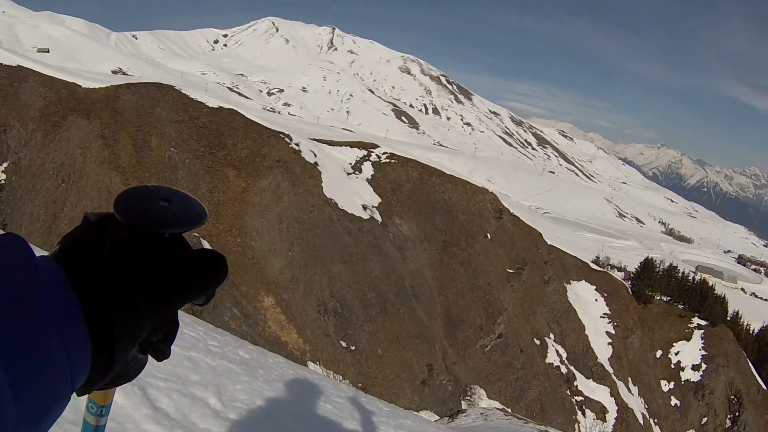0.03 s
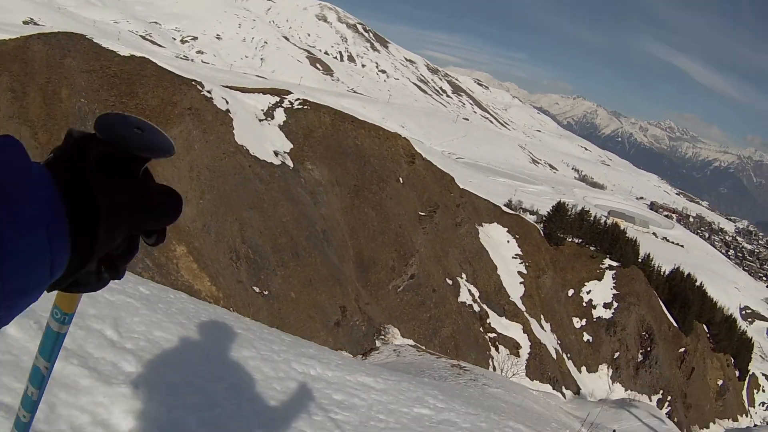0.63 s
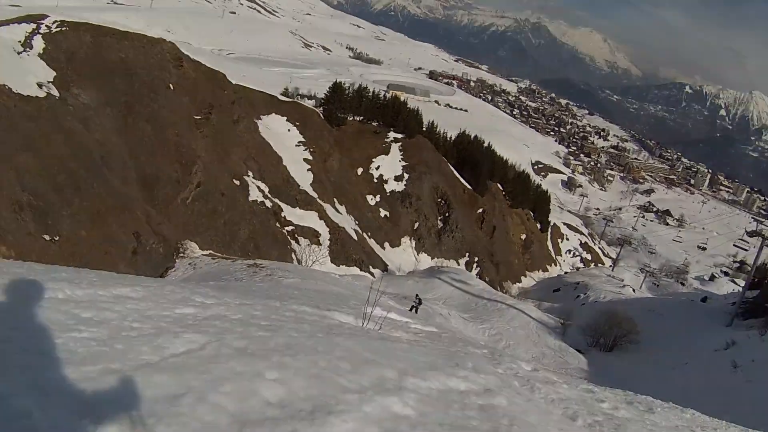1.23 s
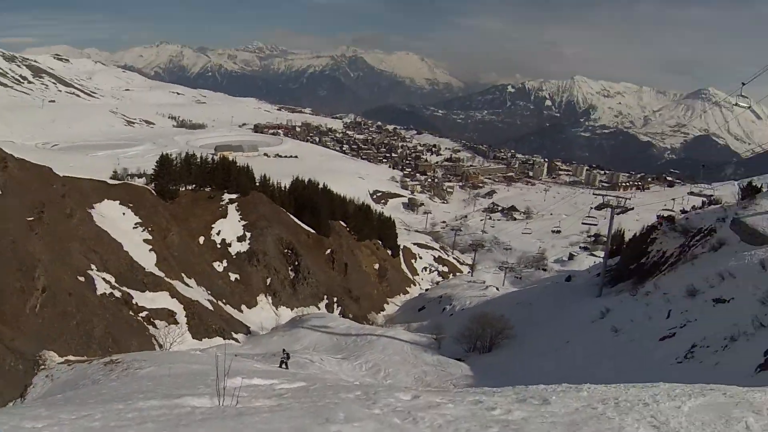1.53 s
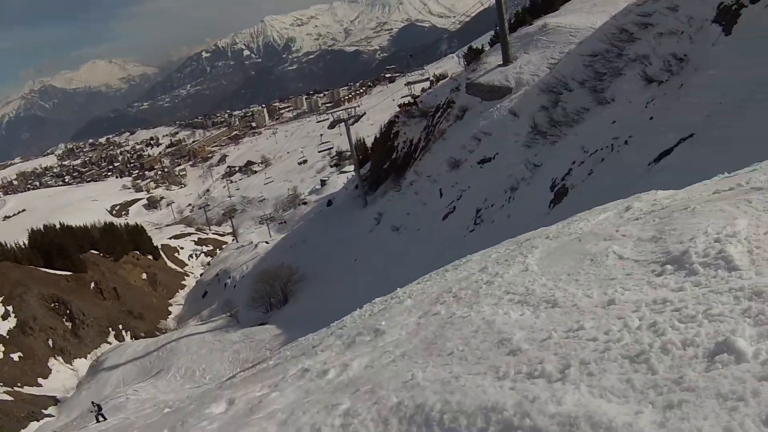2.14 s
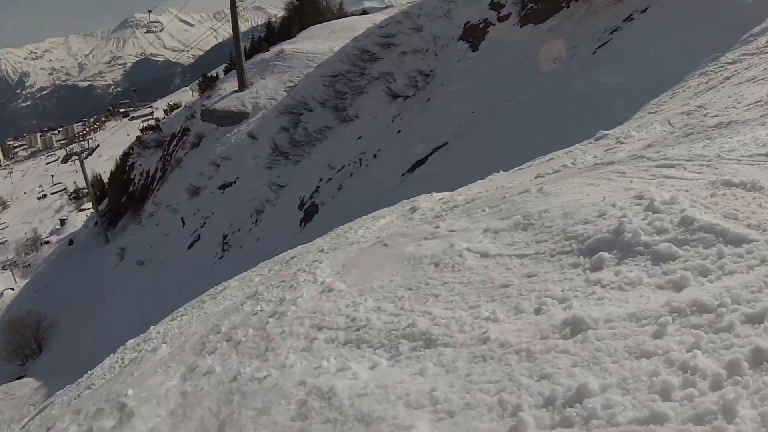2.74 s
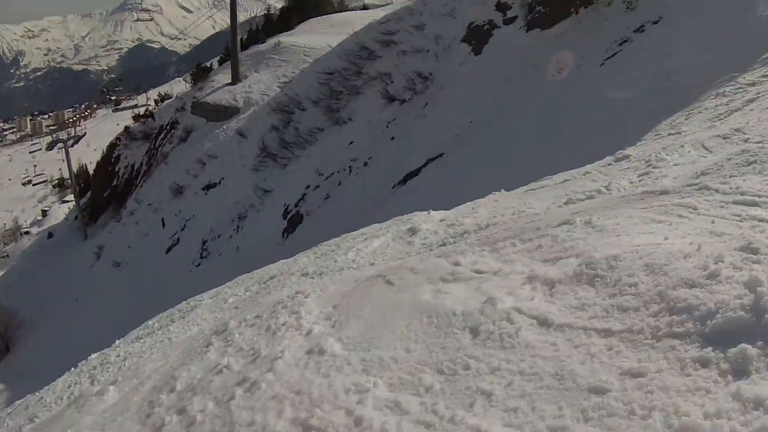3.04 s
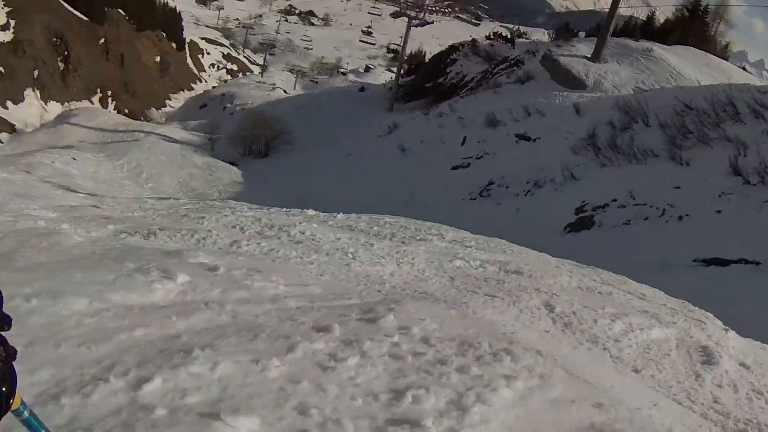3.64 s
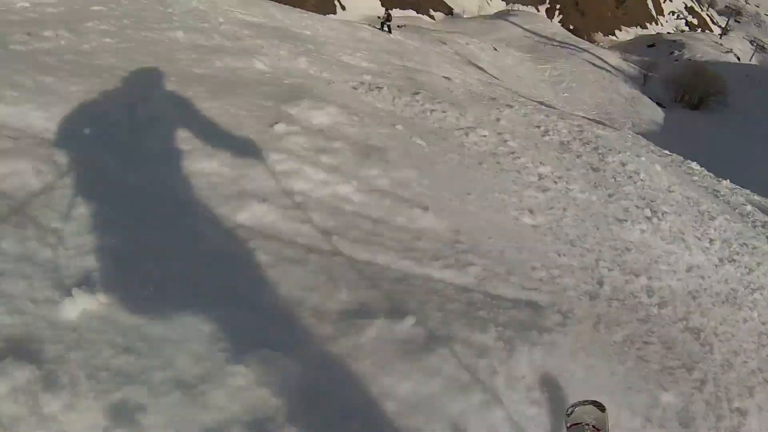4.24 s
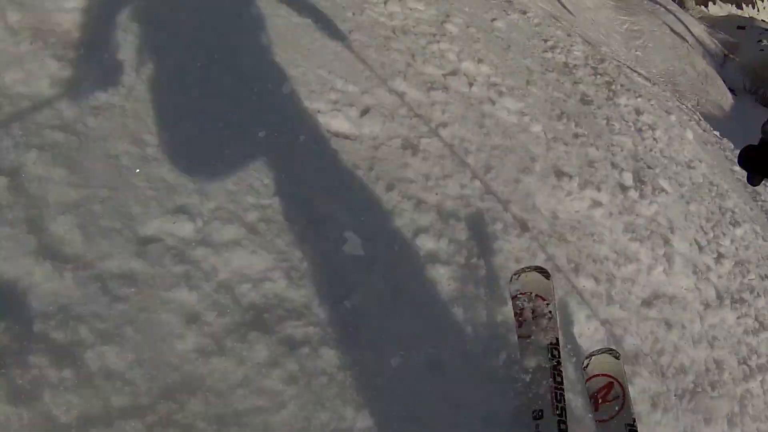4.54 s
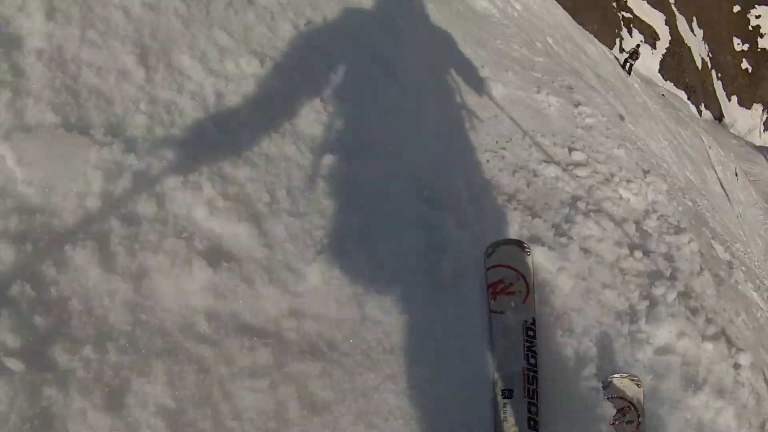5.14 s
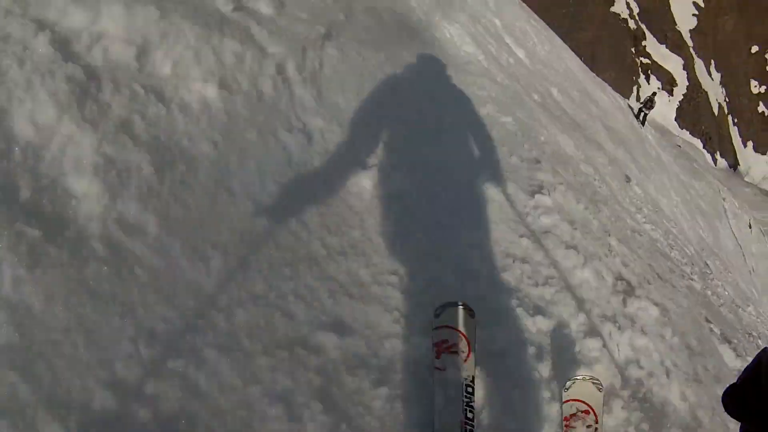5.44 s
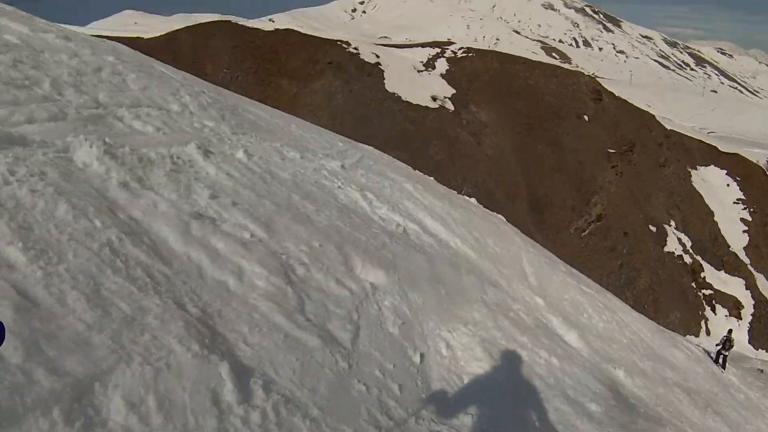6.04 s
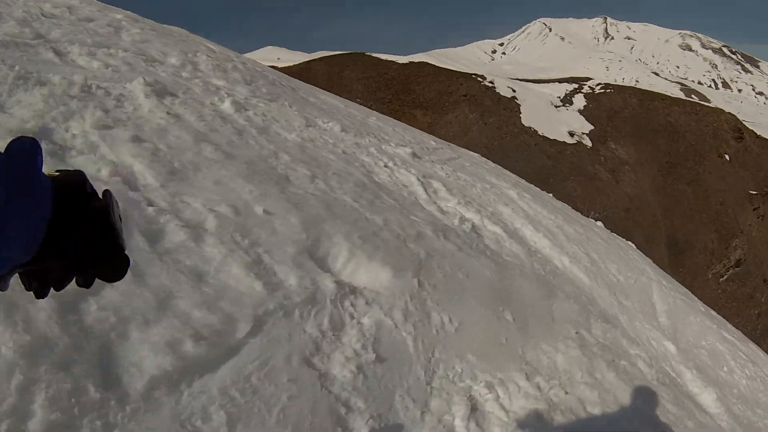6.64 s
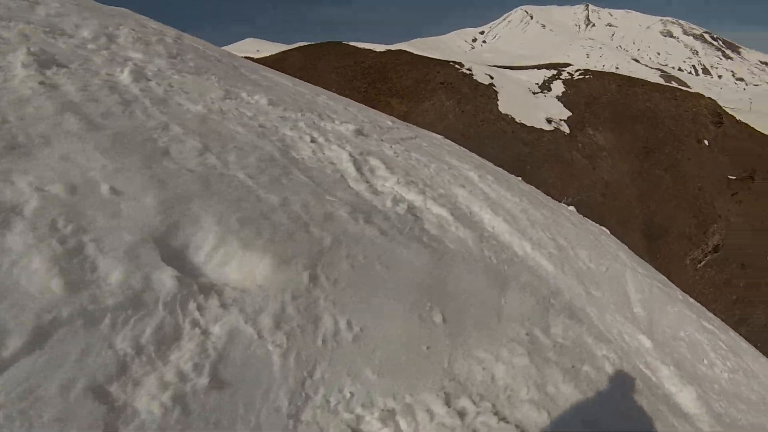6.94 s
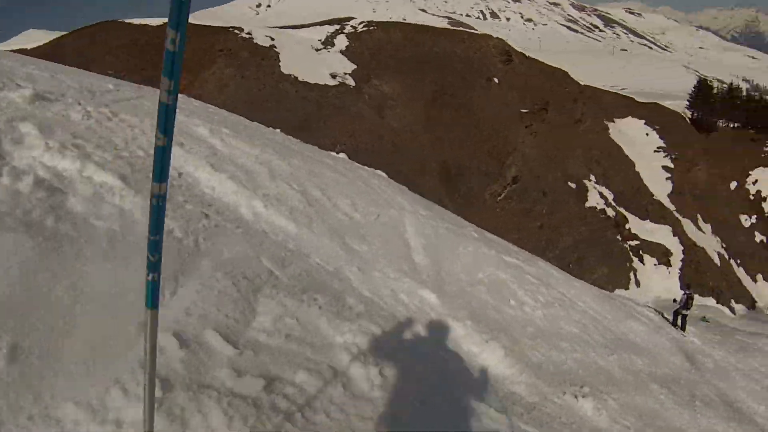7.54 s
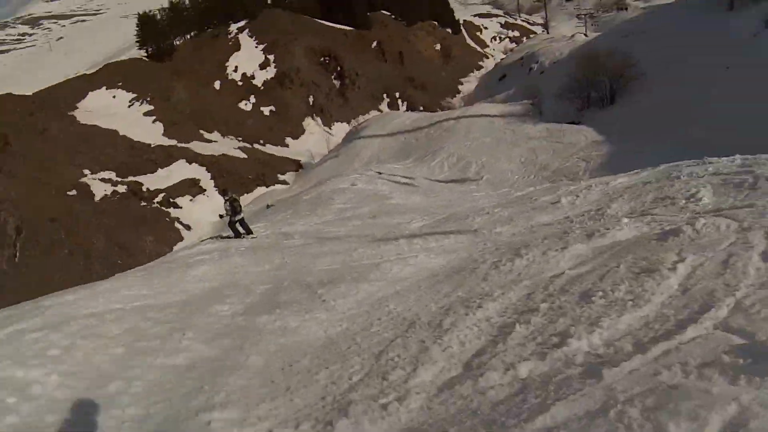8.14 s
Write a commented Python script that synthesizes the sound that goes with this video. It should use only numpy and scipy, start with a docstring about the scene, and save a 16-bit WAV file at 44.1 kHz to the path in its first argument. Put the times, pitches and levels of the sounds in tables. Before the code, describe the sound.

A skier slides down a mountain slope of soft, churned snow, heard from a small body-worn camera in a plastic case. Wind rumbles and gusts on the microphone while the skis rasp and hiss through turns and the case rustles. Midway comes a louder, bumpy skid with hollow clacks, low thumps and stronger wind. Lighter scraping turns follow, and very faint high pips recur throughout.

```python
"""Skiing through soft snow

A skier turns down churned snow, wearing a small camera in a plastic case. The edges crush and shear
grains and throw up spray; a hard, bumpy skid comes in the middle. Turbulent eddies buffet the
microphone and set the case rustling. Gear clacks on the case, jolts thump, and faint high pips recur."""
import sys
import numpy as np
from scipy import signal
from scipy.fft import rfft, irfft
from scipy.io import wavfile
from scipy.ndimage import uniform_filter1d, map_coordinates

SR = 44100
rng = np.random.default_rng(int(sys.argv[2]) if len(sys.argv) > 2 else 0)


def transcribe(u):
    """Save the signal u as a 16-bit wav file named by the first command-line argument.

    u: samples, shape (n,) or (channels, n), limited to [-1, 1]; the rate is SR.
    q: integer samples, one column per channel.
    """
    v = np.clip(np.atleast_2d(u).T, -1, 1)
    q = np.round(v * 32767).astype(np.int16)
    wavfile.write(sys.argv[1], SR, q)


N = 366030


def undb(db):
    """Amplitude ratio of a level in decibels."""
    return 10 ** (np.asarray(db) / 20)


def unit(x):
    """Normalisation to an rms of 1."""
    return x / np.sqrt(np.mean(x ** 2) + 1e-18)


def peak(x):
    """Normalisation to a peak of 1."""
    return x / np.abs(x).max()


def gains(table):
    """Linear interpolation in level: rows (t/s, level/dB, ...) give one envelope per level column."""
    times, *levels = np.transpose(table)
    return [undb(np.interp(np.arange(N) / SR, times, db)) for db in levels]


def bell(s, length_s):
    """Gaussian envelope of height 1, centred on s, with half-power width length_s."""
    return np.exp(-2 * np.log(2) * np.minimum(((np.arange(N) / SR - s) / length_s) ** 2, 20))


def swells(table):
    """Incoherent addition: bells (t/s, width/s, level/dB, ...) sum in power, per level column."""
    power = np.zeros((len(table[0]) - 2, N))
    for s, length_s, *db in table:
        near = slice(max(int((s - 2 * length_s) * SR), 0), int((s + 2 * length_s) * SR))
        power[:, near] += (undb(db)[:, None] * bell(s, length_s)[near]) ** 2
    return np.sqrt(power)


def sags(table):
    """Attenuation: bells (t/s, width/s, depth/dB) sum in decibels; a negative depth is a gain."""
    return undb(-sum(depth_db * bell(s, length_s) for s, length_s, depth_db in table))


def colour(x, points, size=8192):
    """Minimum-phase filter through points (f/Hz, level/dB), made by folding the cepstrum."""
    hz, db = np.transpose(points)
    bins = np.maximum(np.arange(size // 2 + 1) * SR / size, 1)
    magnitude = undb(np.interp(np.log(bins), np.log(hz), db))
    cepstrum = irfft(np.log(magnitude))
    cepstrum[1:size // 2] *= 2
    cepstrum[size // 2 + 1:] = 0
    return signal.fftconvolve(x, irfft(np.exp(rfft(cepstrum))))[:len(x)]


def ring(x, modes):
    """Modal superposition: resonances (f/Hz, bandwidth/Hz, level/dB) add with alternating sign."""
    return sum((-1) ** k * undb(db) * signal.lfilter(*signal.iirpeak(hz, hz / width, SR), x)
               for k, (hz, width, db) in enumerate(modes))


def walk(rate):
    """Smooth random modulation of rms 1, through `rate` independent values a second."""
    steps = rng.standard_normal(N // 16)
    return unit(map_coordinates(steps, [np.arange(N) / SR * rate], order=2, mode="wrap"))


def grains(rate, spread_db):
    """Shot noise: `rate` random impulses a second, with clipped log-normal sizes."""
    hit = rng.random(N) < rate / SR
    size = undb(spread_db * np.clip(rng.standard_normal(N), -2, 2))
    return unit(hit * size * np.sign(rng.standard_normal(N)))


def eddies(spectrum, steady_s):
    """Turbulent pressure: coloured noise whose power stays even over spans longer than steady_s."""
    pressure = colour(rng.standard_normal(N), spectrum)
    power = uniform_filter1d(pressure ** 2, int(steady_s * SR) + 1)
    return unit(pressure / np.sqrt(power + 1e-12))


# Steady air over the microphone: t/s, swell level/dB, buffet level/dB
STEADY_AIR = [(0.0, -39.5, -53.5), (0.16, -39, -49), (0.48, -42.5, -45.5), (0.85, -37, -45),
              (2.5, -41.5, -46.5), (2.91, -36, -40.5), (2.98, -32, -46), (3.12, -49.5, -52.5),
              (4.39, -31, -32.5), (4.48, -17, -27.5), (4.81, -26.5, -28.5), (4.97, -37.5, -44.5),
              (5.99, -42.5, -44.5), (6.13, -37, -38.5), (6.63, -38, -50.5), (7.07, -38.5, -47.5),
              (8.04, -40.5, -43), (8.3, -39.5, -44)]
# Gusts: t/s, width/s, swell level/dB, buffet level/dB
GUSTS = [(0.33, 0.048, -35, -43.5), (0.96, 0.035, -25.5, -64), (1.2, 0.083, -34.5, -44.5),
         (1.48, 0.13, -38, -53.5), (1.85, 0.29, -37.5, -44), (2.22, .15, -42, -44.5),
         (2.59, 0.044, -44, -37.5), (3.68, 0.33, -40.5, -40), (4.23, 0.089, -29, -44),
         (4.54, 0.056, -30, -28), (4.75, 0.15, -21, -43), (5.12, 0.072, -47, -42.5), (6.15, .12, -36, -44),
         (5.33, 0.082, -54, -37), (6.36, 0.055, -32.5, -43.5), (6.57, .08, -31.5, -44.5),
         (7.43, 0.11, -41, -42), (7.66, 0.056, -40, -42.5), (7.79, 0.087, -29, -52),
         (7.98, 0.093, -33.5, -38)]
# Lulls in the air: t/s, width/s, depth/dB
LULLS = [(0.55, 0.1, 6.5), (0.78, .06, 2), (1.02, 0.077, 6), (1.38, 0.047, 2.5), (1.61, 0.053, 4),
         (2.065, 0.067, 6), (3.32, 0.063, -2), (4.63, 0.047, 3.5), (5.72, 0.04, -2), (6.46, 0.072, 4.5),
         (7.186, 0.087, 2), (7.57, 0.063, 9), (7.89, 0.1, 3)]
def airflow():
    """Envelopes of large and small eddies: steady flow and gusts add in power and drop in lulls."""
    swell, buffet = gains(STEADY_AIR)
    gust_swell, gust_buffet = swells(GUSTS)
    calm = sags(LULLS)
    return calm * np.hypot(undb(1.5) * swell, gust_swell), calm * np.hypot(undb(-0.5) * buffet, gust_buffet)


# Pressure spectra of large and of small eddies: f/Hz, relative level/dB
SWELL_SPECTRUM = [(8, -8), (22, 1.5), (34, -5.5), (55, -11.5), (85, -17), (140, -32), (300, -80)]
BUFFET_SPECTRUM = [(40, -21), (75, 0), (125, -0.5), (205, -14.5), (285, -13), (370, -25.5), (500, -30),
                   (650, -33), (1100, -33), (3000, -76.5)]
def wind(flutter, swell, buffet):
    """Turbulence: large eddies sway the diaphragm and modulate the flurries of smaller ones."""
    slow = eddies(SWELL_SPECTRUM, steady_s=0.11)
    roughness = undb(2 * flutter - 1.82 * slow)  # greatest in the suction at a large eddy's core
    quick = unit(eddies(BUFFET_SPECTRUM, steady_s=0.0657) * roughness)
    return swell * slow + buffet * quick


# Modes of the case walls: f/Hz, bandwidth/Hz, relative level/dB
WALL_MODES = [(1446, 112, -4), (2140, 194, 2), (2380, 208, 0.5), (3140, 690, -12), (3810, 620, -14.5)]
# Rubbing carried through the mount: f/Hz, relative level/dB
RUB_SPECTRUM = [(90, -17.5), (205, -4.5), (275, -4.5), (370, -12), (500, -13), (650, -16), (1100, -22.5),
                (3000, -35.5), (5000, -42), (12000, -57)]
def case_rustle(flutter, shear, buffet, buzz):
    """Forced vibration: edge load, eddies and rasps buzz the thin walls; the mount conducts a rub."""
    rest_db = -59.5
    shaking = np.sqrt(undb(rest_db) ** 2 + (undb(-5) * shear) ** 2 + (undb(-18) * buffet) ** 2 + buzz ** 2)
    drive = grains(rate=3200, spread_db=2) * undb(1.1 * flutter + 1.62 * walk(130))
    walls = unit(ring(drive, WALL_MODES))
    rub = unit(colour(drive * undb(0.84 * walk(70)), RUB_SPECTRUM))
    return shaking * (undb(-0.57) * walls + undb(-3.5) * rub)


# Turns: t/s at full load, attack/s, hold/s, release/s, hiss level/dB, spray/dB re hiss, scrape/dB re hiss
TURNS = [(2.698, 0.49, 0.06, 0.28, -51, -11, 1.5), (3.4, 0.12, 0.14, 0.33, -55, -8, 1),
         (4.148, 0.076, 0.12, 0.094, -49, -11.5, -0.5), (4.388, 0.078, 0.027, 0.15, -43.5, -14, 3.5),
         (4.633, .015, .22, 0.46, -48, -8.5, 4.5), (5.4, 0.87, 2.73, 0.17, -56.5, -8.5, -0.5),
         (6.33, 0.38, 0.058, 0.39, -48, -16, 2.5)]
def edge_load():
    """Envelopes of shear, spray and scrape: each turn's load grows and decays exponentially."""
    t = np.arange(N) / SR
    glide_db = [[-65], [-72], [-59.5]]  # shear, spray and scrape of flat skis
    power = undb(glide_db) ** 2
    for s, attack_s, hold_s, release_s, db, spray_db, scrape_db in TURNS:
        rise = np.minimum((t - s) / attack_s, 0)
        fall = np.maximum((t - s - hold_s) / release_s, 0)
        load = undb(db) * np.exp(rise - fall)
        power = power + np.array([load, undb(spray_db) * load, undb(scrape_db) * load]) ** 2
    return np.sqrt(power)


# Resonances in the edge scrape: f/Hz, bandwidth/Hz, relative level/dB
EDGE_MODES = [(1288, 158, -1.5), (1522, 194, 3)]
# Spectra of crushed snow, shearing grains and fine spray: f/Hz, relative level/dB
CRUNCH_SPECTRUM = [(200, -12.5), (450, -9.5), (800, -7), (1150, -0.5), (1800, -3.5), (2500, -8),
                   (3200, -26), (8000, -40.5)]
HISS_SPECTRUM = [(900, -0.5), (2000, 7), (2850, -6), (3120, 4.5), (3950, 4), (4400, 3), (4950, 5),
                 (5600, 0.5), (6200, -4.5), (6850, 2), (7900, -12.5), (9000, -24), (16000, -40)]
SPRAY_SPECTRUM = [(3000, -5), (6000, -23), (7300, 1.5), (8000, 2.5), (8600, -2), (10000, -7.5), (11400, -2),
                  (12700, -11.5), (15000, -16.5)]
# Showers of loose snow: t/s, width/s, spray level/dB
SHOWERS = [(1.02, 0.1, -62.5), (1.63, 0.026, -63), (2.87, .05, -59), (3.1, 0.18, -62.5), (3.93, .04, -65),
           (4.55, 0.028, -62.5), (8.21, .04, -70)]
def skis(flutter, shear, spray, edge):
    """Granular friction: the edges crush lumps, shearing grains hiss and fine spray falls back."""
    shower, = swells(SHOWERS)
    lumps = walk(34)
    crush = grains(rate=4500, spread_db=2.5) * undb(1.25 * lumps + 0.24 * flutter + 1.4 * walk(160))
    scrape = undb(-2) * unit(ring(crush, EDGE_MODES)) + undb(-6.5) * unit(colour(crush, CRUNCH_SPECTRUM))
    hiss = unit(colour(grains(rate=16000, spread_db=6) * undb(1.17 * lumps), HISS_SPECTRUM))
    mist = unit(colour(grains(rate=11000, spread_db=1.5) * undb(lumps), SPRAY_SPECTRUM))
    return edge * scrape + np.hypot(shear, undb(4.5) * shower) * hiss + np.hypot(spray, shower) * mist


# Rasps over rough patches: t/s, width/s, case buzz level/dB, edge scrape level/dB
RASPS = [(0.3, 0.17, -53.5, -60.5), (0.79, 0.13, -54, -59), (0.91, 0.066, -50, -51),
         (1.16, .04, -52.5, -54), (1.25, 0.042, -48, -49.5), (1.65, 0.083, -49.5, -60),
         (1.76, 0.056, -52, -48.5), (2.21, 0.11, -49, -56), (2.315, .06, -50.5, -61),
         (2.47, 0.096, -54.5, -62), (2.59, 0.037, -46.5, -52), (2.71, 0.089, -48, -46.5),
         (2.9, 0.046, -51.5, -52), (3.04, .1, -62, -65), (3.5, 0.14, -52, -55), (3.77, 0.14, -52.5, -54),
         (3.96, 0.063, -52.5, -52.5), (4.16, 0.15, -49, -48), (4.41, 0.045, -43, -44),
         (4.5, 0.068, -44, -45), (4.71, 0.065, -58, -39), (4.85, 0.037, -40.5, -43), (5.32, 0.15, -55, -53),
         (5.87, 0.053, -54, -46), (5.99, 0.037, -44, -44.5), (6.08, 0.065, -42, -52),
         (6.26, 0.05, -43.5, -46), (6.36, 0.097, -48.5, -57), (6.57, 0.047, -50, -46),
         (6.92, 0.11, -50, -49), (7.075, 0.066, -49, -45.5), (7.42, 0.071, -50, -52),
         (7.64, 0.038, -50, -53), (7.81, 0.031, -54, -66), (7.98, .08, -54, -51), (8.09, 0.027, -42.5, -50)]
# Moments when the skis go light: t/s, width/s, depth/dB
LIFTS = [(0.56, 0.17, 3.5), (1.36, 0.088, 0.5), (1.85, .06, 1.5), (3.26, 0.061, -0.5), (4.28, 0.019, 3),
         (4.59, 0.035, 2), (4.8, 0.024, 5), (7.21, 0.07, 1), (8.15, 0.053, 6)]
def sliding(flutter, buffet):
    """Friction noise follows load and roughness, in the case and at the skis alike."""
    shear, spray, scrape = edge_load()
    buzz, rasp = swells(RASPS)
    rustle = case_rustle(flutter, shear, buffet, buzz)
    snow = skis(flutter, shear, spray, np.hypot(scrape, rasp))
    return sags(LIFTS) * (rustle + snow)


def pips(hz=11310, level_db=-70, length_s=0.011, per_s=11):
    """Tone bursts: a faint sine gated at uneven intervals, probably by the camera's electronics."""
    t = np.arange(N) / SR
    since_onset = (t * per_s + .3 * walk(7)) % 1 / per_s
    gate = np.sin(np.pi * np.minimum(since_onset / length_s, 1))
    return undb(level_db + 2.5 * walk(9)) * gate * np.sin(2 * np.pi * hz * t)


# Modes of the struck case: f/Hz, bandwidth/Hz, relative level/dB
CLACK_MODES = [(1340, 140, 8), (2030, 83, 4)]
# Broadband body of a knock: f/Hz, relative level/dB
CRACK_SPECTRUM = [(200, -4), (500, 0), (800, -3), (1400, 0), (2300, -3), (3400, -14), (6000, -32),
                  (15000, -50)]
# Knocks of gear on the case: t/s, clack peak level/dB, tick peak level/dB, contact decay time/s
KNOCKS = [(0.5772, -34.5, -64, .003), (1.4648, -35, -64, .0018), (1.6562, -28.5, -60, .002),
          (1.6922, -34, -64, .0022), (1.7372, -32.5, -64, .004), (4.3788, -19.5, -32, .003),
          (4.4038, -20.5, -48, .004), (4.4374, -22, -52, .002), (4.4442, -24, -52, .001),
          (4.4872, -23.5, -48, .002), (4.5520, -28, -33.5, .0008), (4.5915, -22, -58, .0012),
          (4.7043, -22, -48, .004), (4.7255, -21, -50, .002), (4.7845, -25, -55, .0015),
          (4.8183, -20.5, -54, .001), (6.8822, -26.5, -43, .002)]
def knocks(strike, crack_db, dull_hz):
    """Impact excitation: an impulse and a brief rattle draw a hollow clack and a tick from the case."""
    t = np.arange(SR // 20) / SR
    out = np.zeros(N + len(t))
    plastic = signal.butter(2, dull_hz, fs=SR)  # the wall absorbs the treble
    for s, clack_db, tick_db, contact_s in KNOCKS:
        contact = rng.standard_normal(len(t)) * np.exp(-t / contact_s) + strike * (t == 0)
        crack = undb(crack_db) * unit(colour(contact, CRACK_SPECTRUM))
        clack = signal.lfilter(*plastic, unit(ring(contact, CLACK_MODES)) + crack)
        tick = colour(contact, SPRAY_SPECTRUM)  # as bright as the spray
        start = int(s * SR)
        out[start:start + len(t)] += undb(clack_db) * peak(clack) + undb(tick_db) * peak(tick)
    return out[:N]


# Jolts from lumps of snow and puffs of air: t/s, peak level/dB, centre f/Hz
JOLTS = [(1.535, -27, 137), (1.897, -28.5, 105), (2.582, -31, 254), (2.869, -25.5, 91), (3.697, -31, 268),
         (3.974, -23.5, 92), (4.246, -17.5, 85.5), (4.082, -32, 267), (4.129, -28, 268), (4.446, -32, 280),
         (4.491, -21, 266), (4.545, -16, 137), (4.554, -17.5, 76), (4.593, -26, 262), (4.697, -22, 150),
         (4.707, -22, 270), (4.821, -18, 117), (5.39, -23, 106), (6.122, -30, 224), (7.286, -37.5, 297),
         (7.447, -27.5, 109), (7.881, -35.5, 275), (7.967, -27.5, 115), (7.994, -21, 99), (8.029, -31, 184)]
def jolts():
    """Transient motion: the camera is pushed once and swings back, giving one low pressure pulse."""
    out = np.zeros(N)
    for s, db, hz in JOLTS:
        near = np.arange(int((s - 2 / hz) * SR), int((s + 2 / hz) * SR))
        phase = np.pi * hz * (near / SR - s)
        out[near] -= undb(db) * (1 - 2 * phase ** 2) * np.exp(-phase ** 2)
    return out


def scene():
    """Superposition of the sources, with one shared flutter modulating wind, case and skis."""
    flutter = walk(55)
    swell, buffet = airflow()
    hits = knocks(strike=5.1, crack_db=4, dull_hz=3560) + jolts()
    air = wind(flutter, swell, buffet)
    return (air + sliding(flutter, buffet) + hits + pips())[None]


# Bands the case keeps from the microphone: f/Hz, bandwidth/Hz, level of the part removed/dB
CASE_NOTCHES = [(2850, 230, -10), (4130, 160, -15), (1720, 220, -14), (880, 250, -16)]
def record(dry):
    """Transmission loss: the case weakens a few bands; the camera's low-pass cuts the top steeply."""
    for notch in CASE_NOTCHES:
        dry = dry - ring(dry, [notch])
    cutoff_hz = 15050
    return signal.sosfilt(signal.ellip(10, .2, 80, cutoff_hz, fs=SR, output="sos"), dry)


dry = scene()
out = record(dry)
transcribe(out)
```